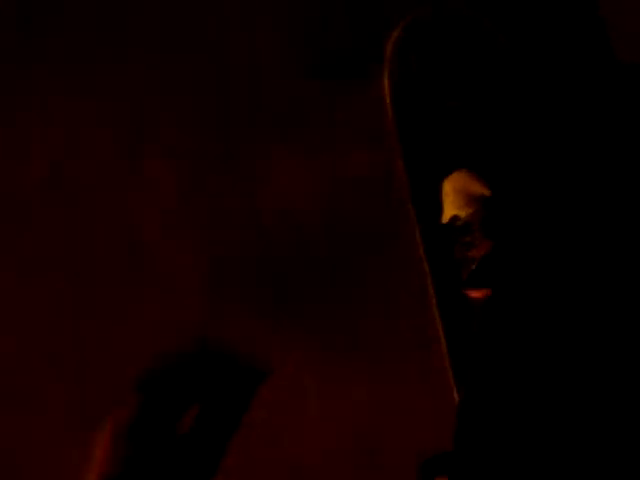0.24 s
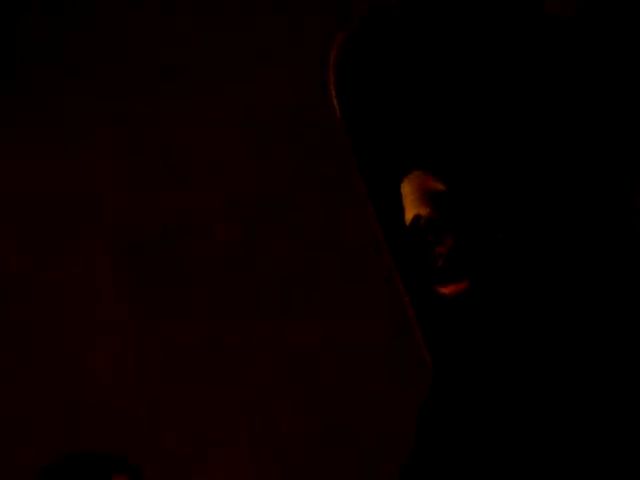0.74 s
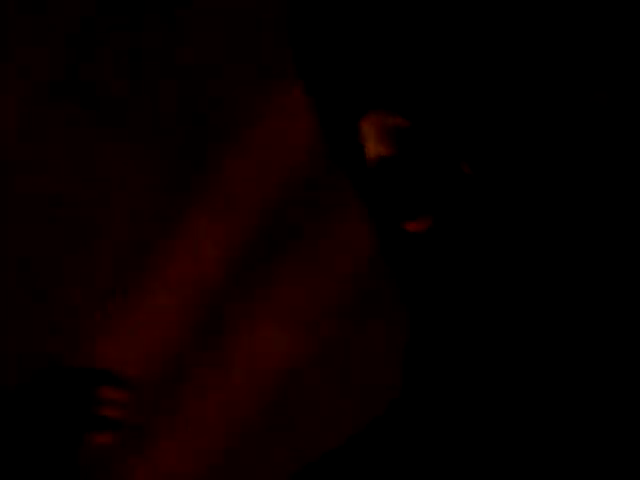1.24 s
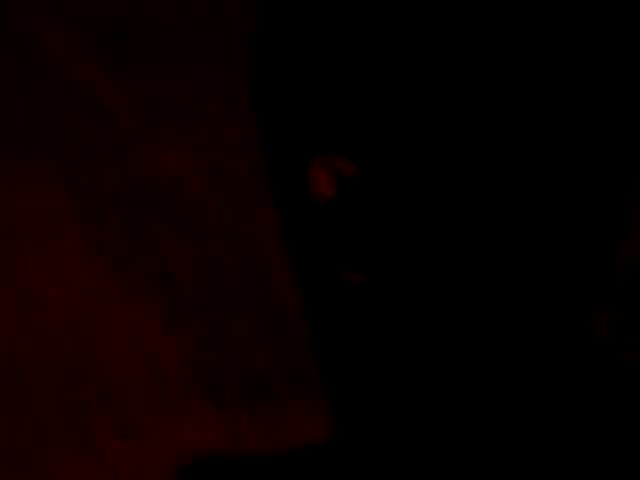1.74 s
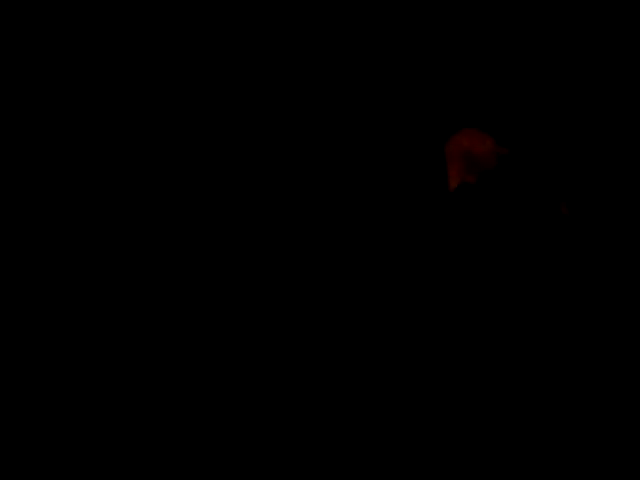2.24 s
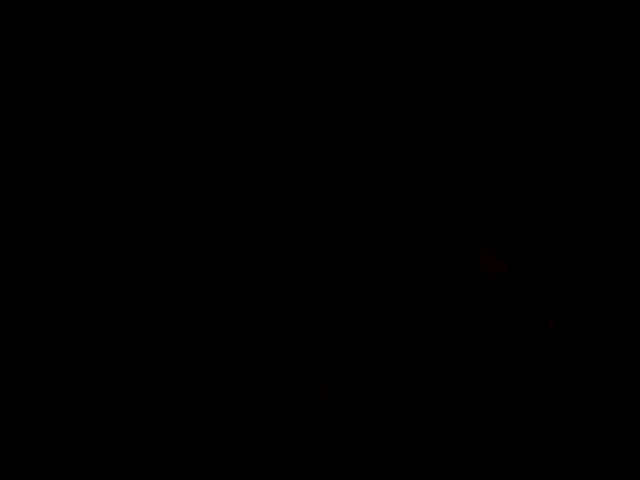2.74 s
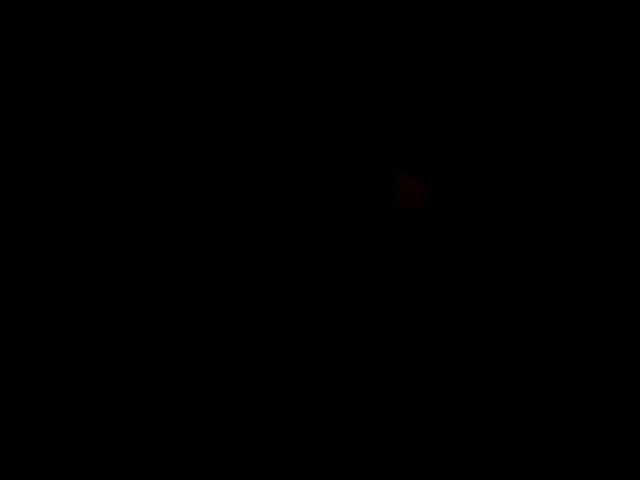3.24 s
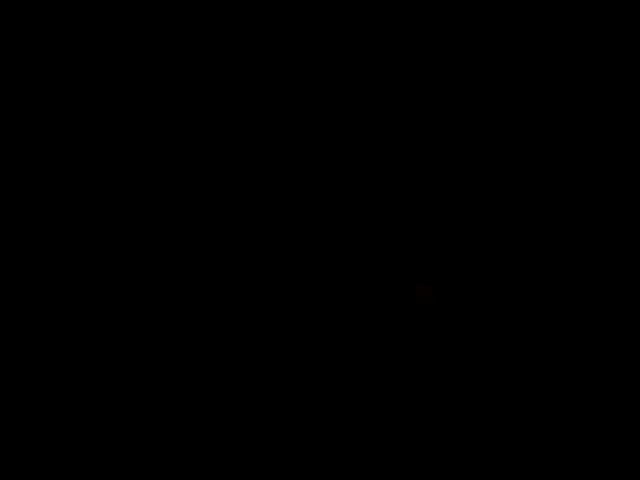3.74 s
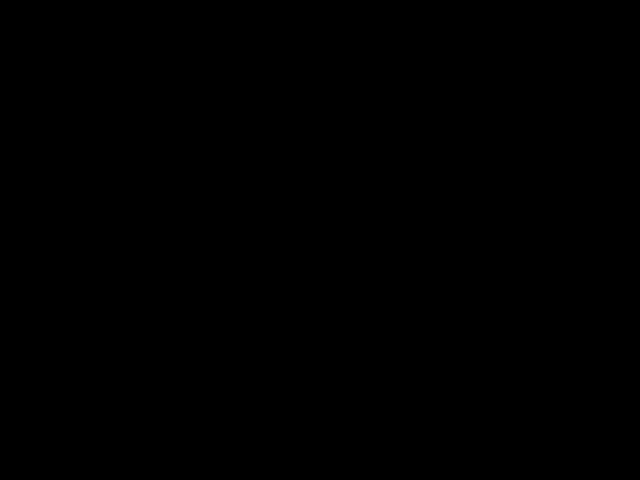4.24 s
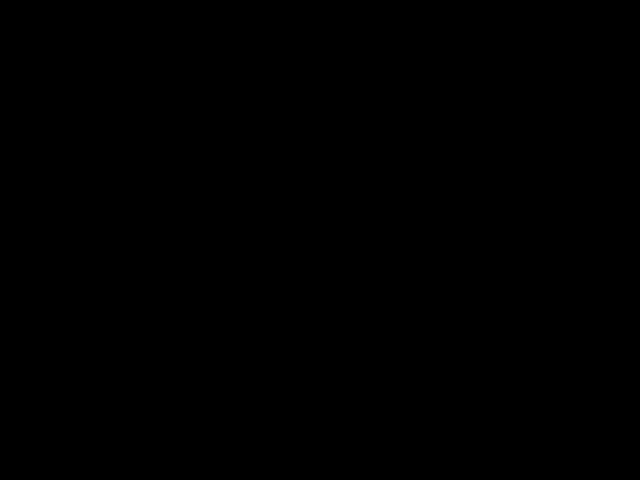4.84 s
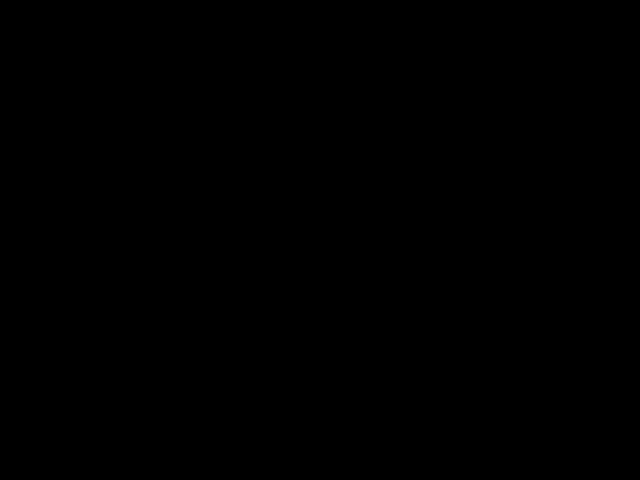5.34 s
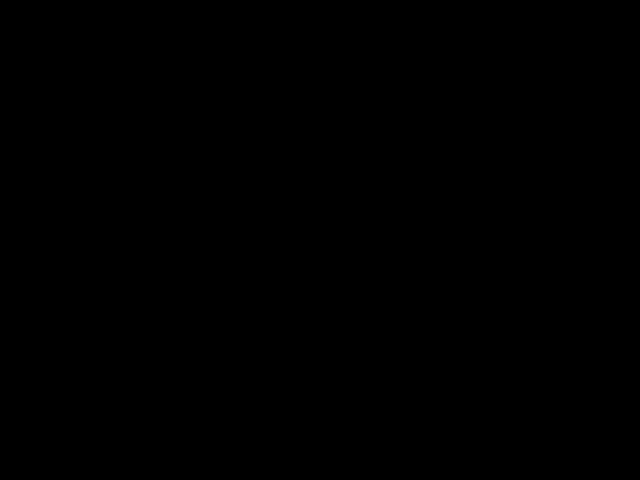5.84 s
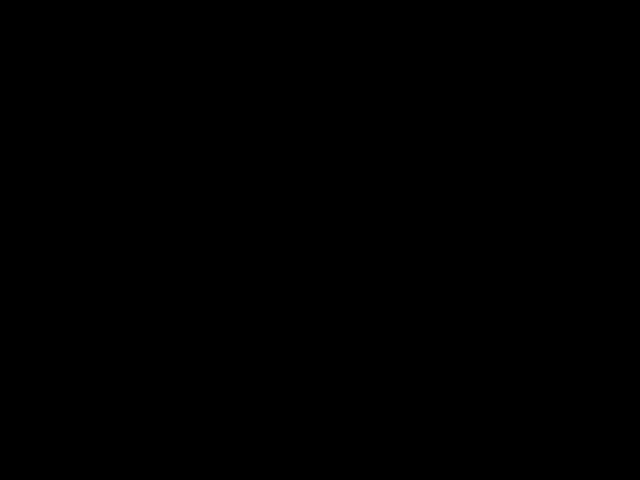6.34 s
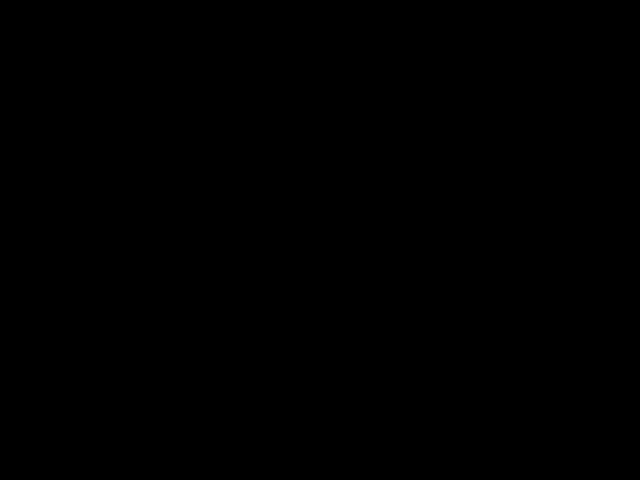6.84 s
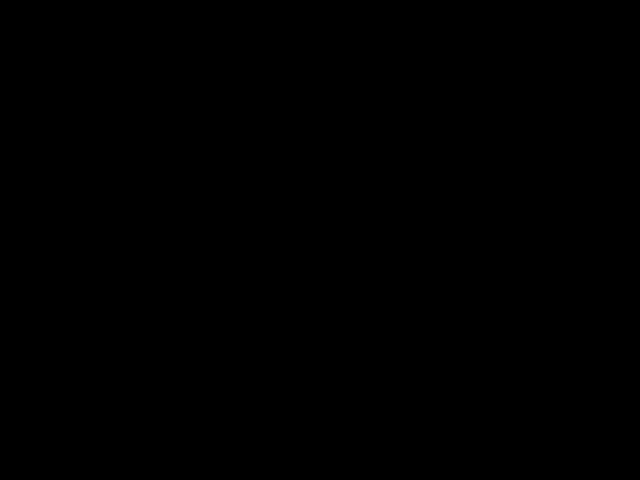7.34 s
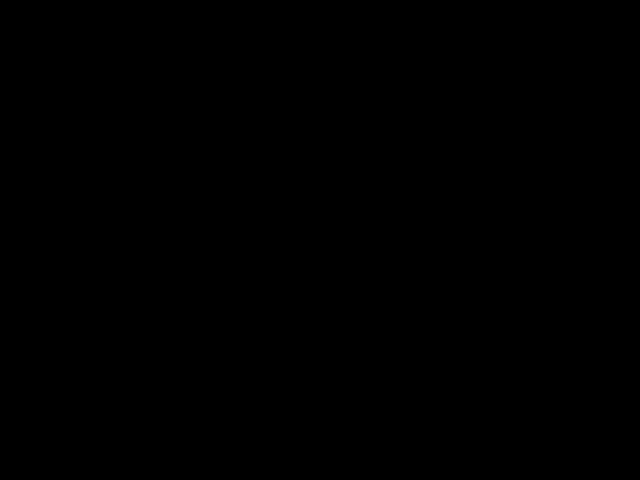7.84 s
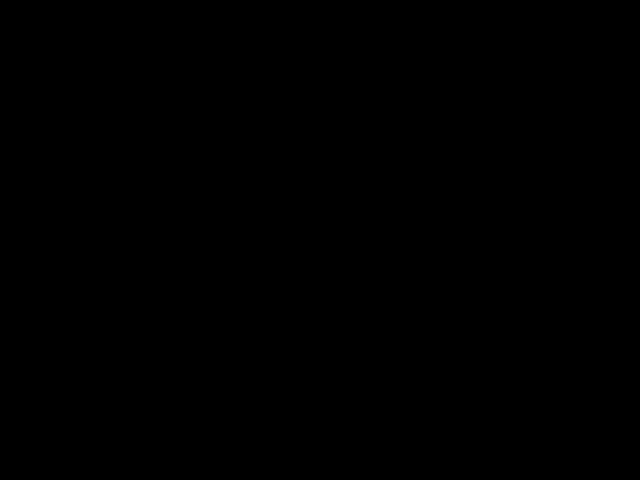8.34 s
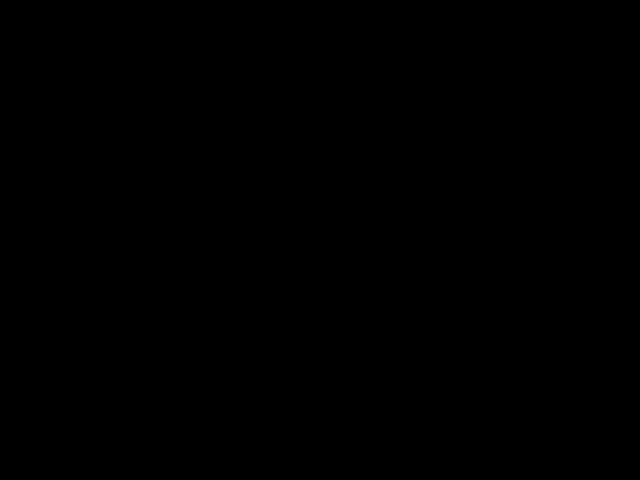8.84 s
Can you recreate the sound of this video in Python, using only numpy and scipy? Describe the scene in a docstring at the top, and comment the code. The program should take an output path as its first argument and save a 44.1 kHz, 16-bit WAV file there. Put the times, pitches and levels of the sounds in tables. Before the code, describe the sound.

Skateboard wheels roll over rough pavement with a gritty rumble, sharp clacks and rattles, heard close up in gusts of wind.

```python
"""A skateboard rumbles and clatters along a paved road, heard from just above it in gusty wind.
Road grain drums on the wheels and rings the deck; cracks knock the trucks, which chatter afterwards.
Ribbed paving hums, slipping wheels rasp, loose metal clinks.
Wind buffets the small hand-held microphone, and the hardest blows overload it."""
import sys
import numpy as np
from scipy import signal
from scipy.fft import rfft, irfft
from scipy.io import wavfile
from scipy.ndimage import uniform_filter1d, map_coordinates

SR = 44100
rng = np.random.default_rng(int(sys.argv[2]) if len(sys.argv) > 2 else 0)


def file_out(sig):
    """Save sig as 16-bit WAV at sys.argv[1]."""
    # one column per channel
    cols = np.atleast_2d(sig).T
    # limit, then scale
    lim = np.clip(cols, -1, 1)
    pcm = np.round(lim * 32767).astype(np.int16)
    wavfile.write(sys.argv[1], SR, pcm)


N = 400428
TIME_S = np.arange(N) / SR
FFT_SIZE = 2 ** 19
FREQ_HZ = np.maximum(np.arange(FFT_SIZE // 2 + 1) * SR / FFT_SIZE, 1)

# wheel judders through broken paving: t/s, hold/s, relative chatter/dB, deck boom/dB
JOLTS = [(1.375, 0.0036, -11, -17), (1.483, 0.0043, -7, -20), (1.561, 0.0018, -4.5, -25),
         (1.659, 0.069, -8, -19), (1.818, 0.022, -10.5, -23.5), (1.944, 0.0044, -13, -24),
         (2.357, 0.0083, -14, -21.5), (3.129, 0.0035, -12, -17.5), (3.185, 0.0037, -8.5, -16),
         (3.303, 0.0061, -4.5, -6), (3.69, 0.041, -5, -2), (3.758, 0.0084, -5, -5.5),
         (3.79, 0.0083, -5, -7), (3.892, 0.052, -5, -5), (4.023, 0.049, -9, -12.5),
         (4.223, 0.02, -10.5, -9), (4.268, 0.0033, -7.5, -6.5), (4.593, 0.0037, -16, -24),
         (7.221, .003, -10, -26.5), (7.274, 0.099, -17.5, -23.5), (7.976, .01, -12.5, -14.5),
         (8.06, .12, -16, -20), (8.745, .14, -19, -21.5)]


def undb(db):
    """Decibels to gain."""
    return 10 ** (np.asarray(db) / 20)


def unit_rms(x):
    """Scale to rms 1."""
    return x / np.sqrt(np.mean(x ** 2))


def spectrum_db(points):
    """Join rows (f/Hz, level/dB) on a log-frequency axis."""
    hz, db = np.transpose(points)
    return np.interp(np.log(FREQ_HZ), np.log(hz), db)


def colour(x, gain_db):
    """Minimum-phase filter: rings after a click, never before."""
    cepstrum = irfft(np.log(undb(gain_db)))
    cepstrum[1:FFT_SIZE // 2] *= 2
    cepstrum[FFT_SIZE // 2 + 1:] = 0
    return irfft(rfft(x, FFT_SIZE) * np.exp(rfft(cepstrum)))[:N]


def band(x, lo_hz, hi_hz, order=4):
    """Zero-phase band-pass."""
    gain = 1 / (1 + (lo_hz / FREQ_HZ) ** (2 * order)) / (1 + (FREQ_HZ / hi_hz) ** (2 * order))
    return irfft(rfft(x, FFT_SIZE) * gain)[:N]


def wander(rate_hz):
    """Smooth random curve, spread near 1."""
    steps = rng.standard_normal(4096)
    return map_coordinates(steps, [TIME_S * rate_hz], order=2, mode="wrap")


def grains(rate_hz, spread_db):
    """Tiny random impacts of steady mean power: many weak, a few strong."""
    sizes = undb(spread_db * np.minimum(rng.exponential(size=N), 5.5))
    clicks = (rng.random(N) < rate_hz / SR) * sizes * rng.choice([-1, 1], N)
    return clicks / np.sqrt(uniform_filter1d(clicks ** 2, size=6000) + 1e-9)


def swell(crest_s, db, sigma_s):
    """Gaussian envelope."""
    return undb(db) * np.exp(-0.5 * np.minimum(((TIME_S - crest_s) / sigma_s) ** 2, 100))


def fades(events, decay_s):
    """Jump-hold-decay envelope from rows (t/s, hold/s, level/dB); the strongest prevails."""
    envelope = np.zeros(N)
    for t_s, hold_s, db in events:
        start = int(t_s * SR)
        age_s = TIME_S[:min(SR // 4, N - start)]
        span = slice(start, start + len(age_s))
        fade = undb(db) * np.exp(-np.maximum(age_s - hold_s, 0) / decay_s)
        envelope[span] = np.maximum(envelope[span], fade)
    return envelope


def wind(breeze_db=-36, gust_rise_s=0.34, flutter_db=4.5):
    """Air streams over the microphone with a low flutter; single eddies thump it."""
    # start/s, end/s, level/dB
    gusts = [(3.047, 4.7, -29), (5.303, 5.78, -28.5), (7.45, 9.4, -25)]
    # stream spectrum: f/Hz, level/dB
    wind_tone = [(10, -15), (28, 3.5), (70, -3.5), (130, -7), (250, -20.5), (800, -40), (3000, -59)]
    # eddies: crest/s, level/dB, sigma/s, nominal f/Hz
    buffets = [(3.805, -13.5, 0.07, 83.5), (4.211, -13.5, 0.021, 57.3), (4.492, -8.5, 0.0073, 52.2),
               (5.56, -10, 0.03, 96), (6.67, -16.5, 0.045, 60), (7.516, -17.5, 0.015, 69),
               (7.971, -15, 0.055, 61.6), (8.192, -11, 0.019, 56), (8.357, -9.5, 0.043, 87.1),
               (8.849, 0, 0.0059, 44.46)]
    gusting = sum(undb(db) * ((TIME_S > start_s) & (TIME_S < end_s)) for start_s, end_s, db in gusts)
    flow = undb(breeze_db) + uniform_filter1d(gusting, int(gust_rise_s * SR))
    stream = unit_rms(colour(rng.standard_normal(N), spectrum_db(wind_tone))) * flow
    stream *= undb(flutter_db * wander(rate_hz=15))
    # pressure swings unevenly as an eddy passes
    warped_s = np.cumsum(np.exp(0.53 * wander(rate_hz=130))) / SR
    eddies = sum(swell(crest_s, db, sigma_s) * np.sin(2 * np.pi * hz * warped_s)
                 for crest_s, db, sigma_s, hz in buffets)
    return stream + eddies * np.sqrt(2)


def scuffs():
    """A slipping wheel gives a short, high rasp."""
    # crest/s, level/dB, sigma/s
    slips = [(5.544, -44, 0.023), (7.104, -44.5, .03), (7.523, -36.5, 0.0067), (8.757, -32, 0.006)]
    rasp = unit_rms(band(grains(rate_hz=9200, spread_db=5.5), 3700, 6000))
    return rasp * sum(swell(*slip) for slip in slips)


def clinks():
    """A loose washer buzzes against the truck for an instant and rings it."""
    # t/s, level/dB
    touches = [(1.499, -19.5), (1.799, -19.5), (4.267, -21.5), (7.22, -19.5)]
    # f/Hz, width/Hz, gain/dB
    truck_modes = [(2720, 550, -1.5), (3960, 300, -9)]
    buzz = rng.standard_normal(N) * fades([(t_s, 0, db) for t_s, db in touches], decay_s=0.0039)
    ringing = np.zeros(N)
    for hz, width_hz, db in truck_modes:
        resonance = signal.iirpeak(hz, hz / width_hz, fs=SR)
        makeup_gain = np.sqrt(SR / np.pi / width_hz)
        ringing += undb(db) * makeup_gain * signal.lfilter(*resonance, buzz)
    return ringing


def drone(centre_hz=352, width_hz=45):
    """Ribbed paving keeps one wheel resonance humming."""
    # crest/s, level/dB, sigma/s
    ribbed_patches = [(7.37, -16, 0.16), (7.673, -20.5, 0.043), (8.12, -18.5, 0.16), (8.392, -13.5, 0.066),
                      (9.062, -15, 0.034)]
    resonance = signal.iirpeak(centre_hz, centre_hz / width_hz, fs=SR)
    force = band(grains(rate_hz=620, spread_db=1.5), 180, 390)
    hum = unit_rms(signal.lfilter(*resonance, force))
    return hum * sum(swell(*patch) for patch in ribbed_patches)


def deck_boom():
    """In a jolt the deck flexes under the rider's weight and booms."""
    flex = fades([(t_s, hold_s, db) for t_s, hold_s, _, db in JOLTS], decay_s=0.011)
    return unit_rms(band(rng.standard_normal(N), 120, 340, order=2)) * flex


def board_lift_db():
    """Resonances of deck, trucks and wheels lift any contact force."""
    # f/Hz, width/Hz, lift/dB
    board_modes = [(162.8, 130, 0), (373.5, 85, 5.5), (430, 27, 2), (575.5, 104, 6.5), (757, 42, 5),
                   (841.6, 63, 6.5), (1075, 31, 3), (1426, 470, 3.5), (2210, 380, 2.5), (2700, 790, 3)]
    return sum(db / (1 + (2 * (FREQ_HZ - hz) / width_hz) ** 2) for hz, width_hz, db in board_modes)


def knocks(lift_db, contact_hz=1900, gain_db=2.0):
    """A wheel hits a crack or stone: push, jangle and dying rebounds ring the board."""
    # t/s, relative level/dB
    blows = [(0.6, -0.5), (0.749, -6.5), (0.904, -8), (1.152, -6), (1.635, -3), (1.662, 2.5), (1.686, 0.5),
             (1.723, 3), (1.772, -12), (1.798, -4.5), (1.834, -1), (1.862, -2.5), (1.905, -0.5),
             (1.914, -3.5), (1.948, -4), (1.987, -4.5), (2.03, -21.5), (2.075, -9.5), (2.105, -2.5),
             (2.128, -5), (2.164, -2.5), (2.199, -5.5), (2.248, -9), (2.344, -9.5), (2.391, -12),
             (3.303, -3), (3.72, 6.5), (3.79, -0.5), (3.921, 2), (4.072, -3.5), (4.269, 3.5), (4.353, -7.5)]
    # impact spectrum: f/Hz, level/dB
    knock_tone = [(60, -32), (200, -15.5), (450, 0), (760, 1), (1150, -4), (1550, -12.5), (2900, -22),
                  (4200, -26.5), (5500, -31.5)]
    impulses = np.zeros(N)
    for t_s, db in blows:
        impulses[int(t_s * SR) + SR // 1000] += undb(db)
    # soft tread rounds the push; the treble comes from loose bolts and bearings
    push = band(impulses, 20, contact_hz, order=2)
    jangle = band(rng.standard_normal(N), contact_hz, 9000, order=2)
    jangle *= fades([(t_s, 0, db) for t_s, db in blows], decay_s=0.0025)
    # trucks chatter briefly after a blow and throughout a jolt
    after_blows = [(t_s, 0, db - 10.5) for t_s, db in blows]
    in_jolts = [(t_s, hold_s, db) for t_s, hold_s, db, _ in JOLTS]
    chatter = fades(after_blows + in_jolts, decay_s=0.011) * grains(rate_hz=1800, spread_db=3.0)
    force = push + undb(-19.5) * jangle + undb(-20.0) * chatter
    body_db = spectrum_db(knock_tone) + 1.25 * lift_db
    unit_clack = colour(np.ones(1), body_db)
    return colour(force, body_db) * undb(gain_db) / np.abs(unit_clack).max()


def paving(blend_s=0.16):
    """Road properties over time, each stretch blending into the next."""
    # start/s, grain spread/dB, then at cruising level: rumble/dB, whirr/dB, hiss/dB
    stretches = [(0, 3.5, -20, -45.5, -46.5), (1.76, 4.5, -20.5, -44.5, -46),
                 (2.42, 0.1, -20.5, -48.5, -47), (2.981, 1, -18.5, -48, -42),
                 (3.9, 1.5, -20.5, -50.5, -49.5), (5.52, 2, -26, -46, -51.5), (6.65, 1.5, -23, -49.5, -47),
                 (7.06, 2.5, -23, -50, -42.5), (7.58, 2.5, -20.5, -47.5, -47.5),
                 (7.95, 2.5, -22, -48, -41.5), (8.261, 2.5, -19.5, -48, -46.5)]
    start_s, *columns = np.transpose(stretches)
    stretch = np.searchsorted(start_s[1:], TIME_S)
    return [uniform_filter1d(column[stretch], int(blend_s * SR)) for column in columns]


def rolling(lift_db, cruise_db=-20, rumble_db_per_db=0.87, hiss_db_per_db=0.65):
    """Road grain drums on the wheels; their load flutters as they turn."""
    # drumming, set by speed and load: t/s, level/dB
    drumming = [(0, -12), (0.1, -16), (0.33, -19.5), (0.57, -17.5), (1.25, -22), (1.68, -18.5), (1.88, -28),
                (2.06, -30.5), (2.14, -19.5), (2.48, -40.5), (2.71, -23.5), (3.02, -22.5), (3.21, -14),
                (3.53, -26), (3.75, -14.5), (4.2, -17.5), (4.62, -22), (5.45, -20.5), (5.7, -17),
                (6.55, -17), (7.0, -21.5), (7.35, -16.5), (7.8, -18), (8.08, -13.5), (8.5, -20),
                (8.88, -14.5), (9.08, -23)]
    # contact force spectrum: f/Hz, level/dB
    roll_tone = [(30, -22.5), (100, -11.5), (160, 3), (300, 0.5), (500, -1), (700, -8), (950, -10),
                 (1200, -16.5), (1400, -18), (1700, -23.5), (2200, -24), (3000, -33), (4000, -34.5),
                 (5300, -29.5)]
    # grit spectrum: f/Hz, level/dB
    grit_tone = [(900, 5), (1750, 13), (2300, 0.5), (3000, 3), (5300, 3.5)]
    level_db = np.interp(TIME_S, *np.transpose(drumming))
    drive_db = level_db - cruise_db
    spread_db, rumble_db, whirr_db, hiss_db = paving()
    load = undb(0.53 * spread_db * wander(rate_hz=39))
    stones = grains(rate_hz=4500, spread_db=spread_db) * load
    board = colour(stones, spectrum_db(roll_tone) + lift_db)
    rumble = unit_rms(band(board, 20, 394.5)) * undb(rumble_db + rumble_db_per_db * drive_db)
    roar = unit_rms(band(board, 482.5, 1408)) * undb(level_db)
    whirr = unit_rms(band(board, 2000, 3200, order=6)) * undb(whirr_db + drive_db)
    # fine grit crushed under the tread: denser grains
    grit = grains(rate_hz=8800, spread_db=5.5) * np.sqrt(load)
    crunch = colour(0.5 * stones + grit, spectrum_db(grit_tone))
    hiss = unit_rms(band(crunch, 850, 5600, order=6)) * undb(hiss_db + hiss_db_per_db * drive_db)
    return rumble + roar + whirr + hiss


def scene():
    """Board and wind at the microphone, mono."""
    lift_db = board_lift_db()
    mix = rolling(lift_db) + drone() + knocks(lift_db) + deck_boom() + scuffs() + wind() + clinks()
    return mix[None]


def record(dry, ceiling=0.77, top_hz=15900):
    """The microphone colours the sound, its amplifier flattens the peaks, and the top is cut."""
    # response with a narrow notch and a steep top: f/Hz, gain/dB
    microphone = [(3020, 0), (3240, -27), (3520, -30), (3740, 0), (5250, 0), (5520, -36), (6500, -62)]
    heard = colour(dry[0], spectrum_db(microphone))
    clipped = heard / (1 + (heard / ceiling) ** 20) ** (1 / 20)
    low_pass = signal.ellip(8, 0.2, 70, top_hz, fs=SR, output="sos")
    return signal.sosfilt(low_pass, clipped)[None]


dry = scene()
out = record(dry)
file_out(out)
```